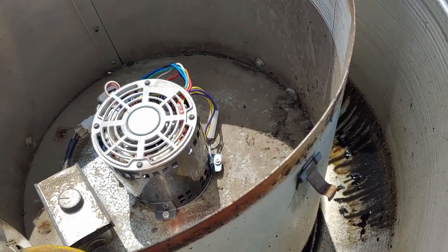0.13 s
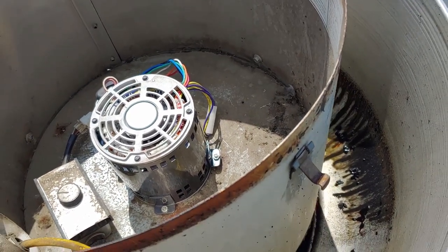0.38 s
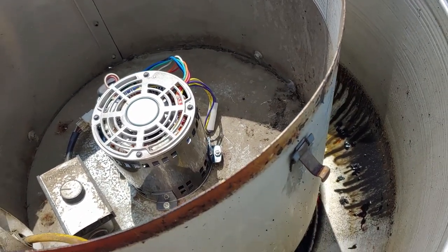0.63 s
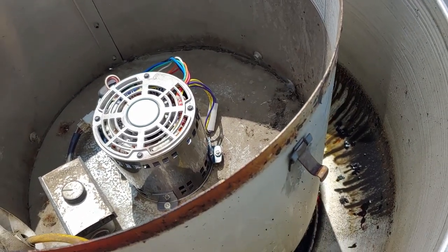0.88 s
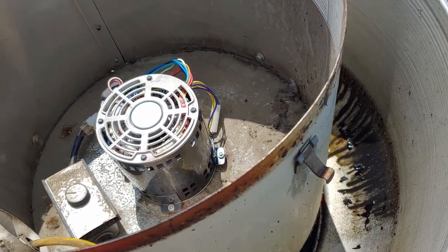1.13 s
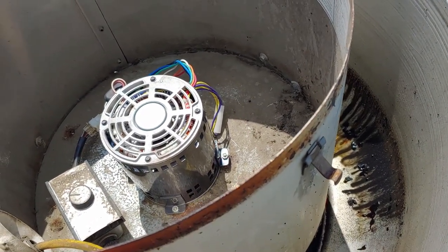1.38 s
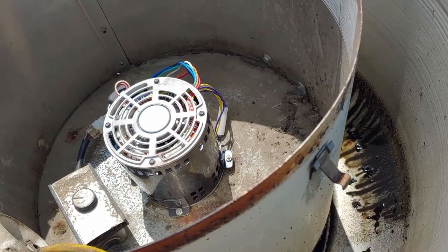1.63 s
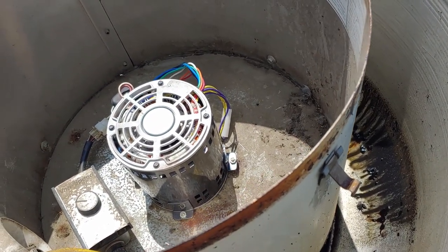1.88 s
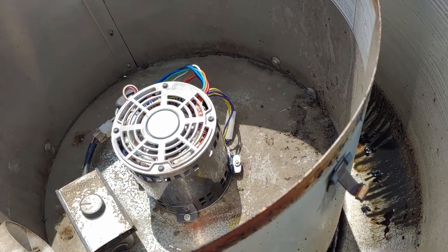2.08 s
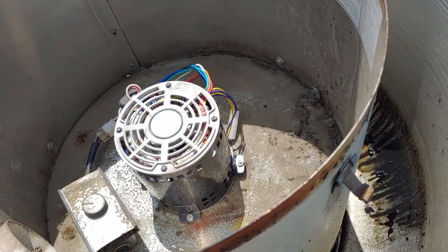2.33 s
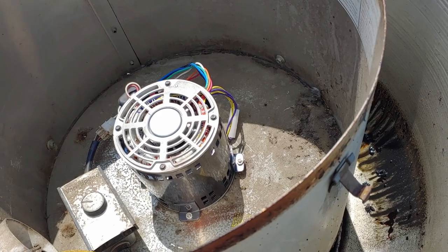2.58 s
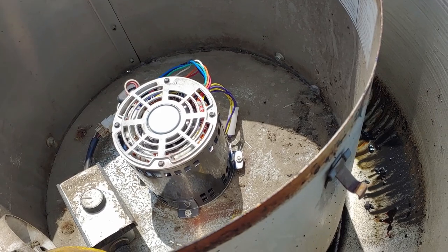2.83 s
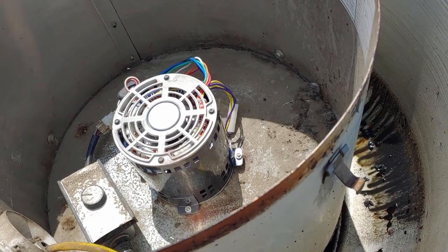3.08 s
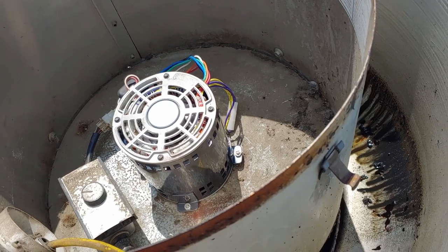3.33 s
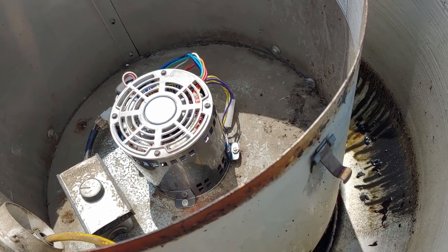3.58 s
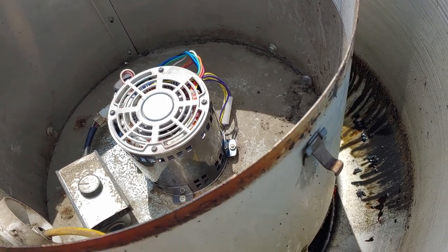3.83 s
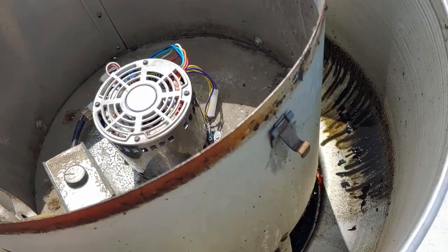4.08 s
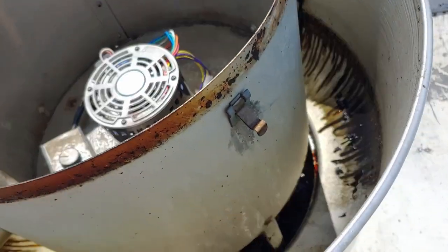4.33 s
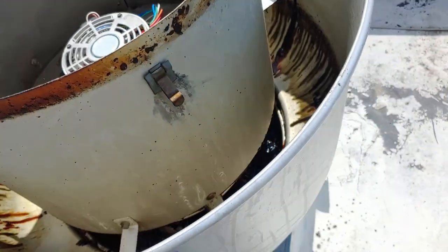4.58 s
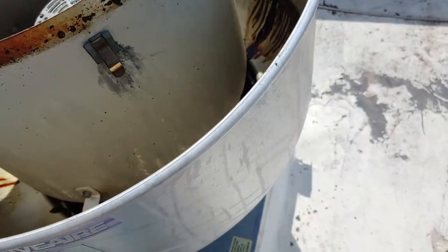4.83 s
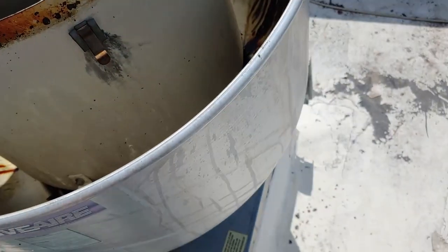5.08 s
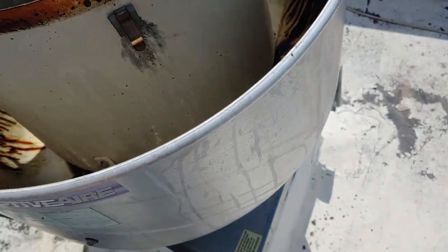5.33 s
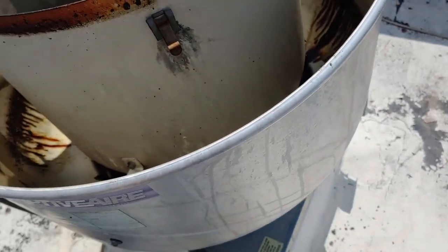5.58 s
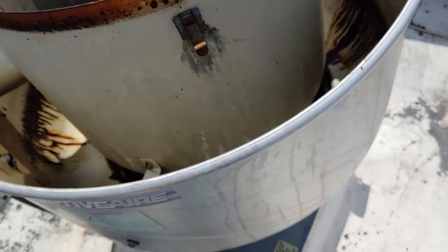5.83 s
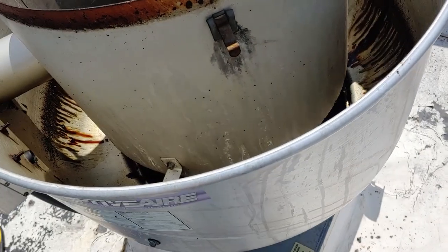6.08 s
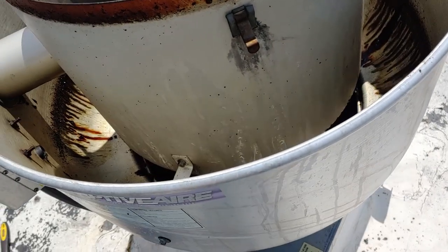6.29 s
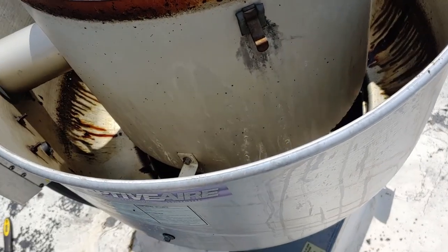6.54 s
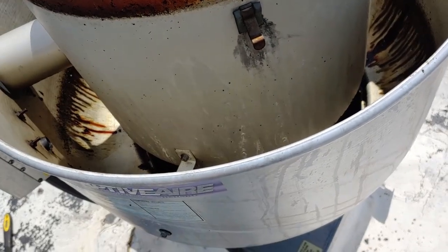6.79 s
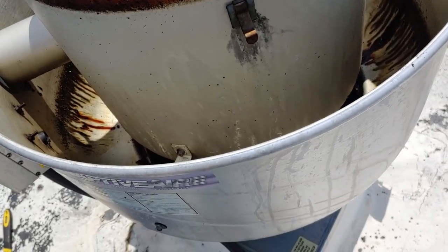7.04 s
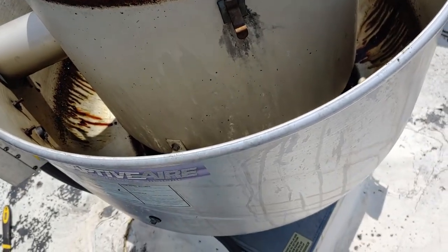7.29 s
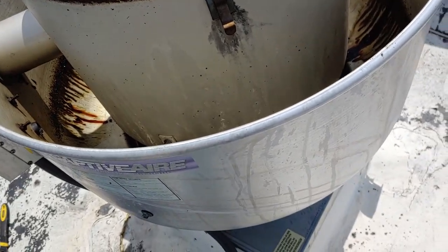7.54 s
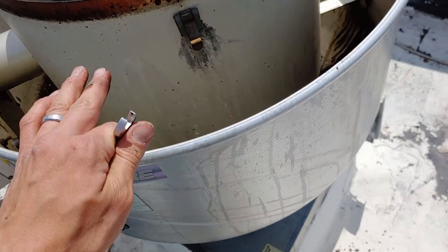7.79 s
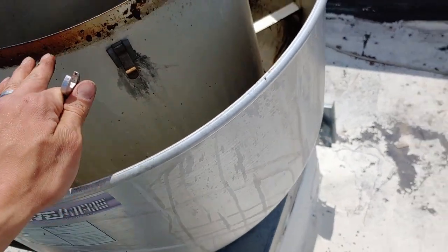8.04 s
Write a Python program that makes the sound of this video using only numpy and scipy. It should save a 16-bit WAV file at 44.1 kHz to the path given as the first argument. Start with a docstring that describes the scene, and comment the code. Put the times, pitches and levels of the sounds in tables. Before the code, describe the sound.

Electric fan motor hums and whines upward as rushing air builds to a steady roar, with wind thumps, mostly left, and scratchy metallic ticks.

```python
"""A rooftop exhaust fan runs up to speed: mains hum and blade tones are sines, rotor whines sweep through
housing resonances, and a roar and a rush of air are filtered noise that grows with speed.
Gusts buffet two microphone ports, mostly the left, as lumpy low noise with sharp pops.
Grit rattles on the sheet-metal housing as noise bursts that ring its modes; a faint hiss lies far off.
The recorder ducks after loud gusts and overloads softly."""
import sys
import numpy as np
from scipy import signal
from scipy.fft import rfft, irfft, next_fast_len
from scipy.io import wavfile
from scipy.ndimage import uniform_filter1d

SR = 44100
rng = np.random.default_rng(int(sys.argv[2]) if len(sys.argv) > 2 else 0)


def natural_amplitude(level_db):
    """Convert a level in decibels to a linear amplitude factor, elementwise."""
    exponent = np.asarray(level_db, float) / 20
    return 10 ** exponent


def unload_wav(signal):
    """Save mono or channel-first audio to the path in sys.argv[1] as 16-bit WAV at rate SR, clipped to [-1, 1]."""
    wavfile.write(
        sys.argv[1],
        SR,
        np.round(np.clip(np.atleast_2d(signal).T, -1, 1) * 32767).astype(np.int16),
    )


N = 360297
T = np.arange(N) / SR
FFT_SIZE = next_fast_len(N)
MAINS_HZ, FULL_SPEED_HZ = 59.8, 248  # full speed in blades per second

# fan speed: time_s, blade_rate_hz
BLADE_RATE = [(0, 60.22), (.5, 67.9), (.95, 71.24), (1.4, 80.26), (1.8, 91.6), (2.2, 107.3), (2.5, 122),
              (2.65, 129.5), (2.9, 145.2), (3.2, 165.3), (3.5, 186), (3.9, 209), (4.3, 235), (4.6, 246.6),
              (4.95, 249.6), (8.17, 248.8)]
# hum at twice the mains: time_s, rms_db
HUM_LEVEL = [(0, -22.5), (1.3, -38.5), (2.4, -22.5), (3.5, -23), (4.5, -22), (4.85, -32.5), (5.4, -30.5),
             (5.7, -22.5), (6.05, -22.5), (6.25, -24.5), (7.1, -34.5), (7.4, -22), (7.75, -35), (8, -19),
             (8.17, -30.5)]
# further hum lines: mains_multiple
LOAD_HUM_MULTIPLES = (3, 4, 6)
# base level of those lines: rms_db
LOAD_HUM_LEVELS = (-24.5, -32, -35)
# gain on those lines under run-up load: time_s, gain_db
LOAD_GAIN = [(0, -2), (.75, 2.5), (1.05, -8), (1.5, -2), (2.2, 3.5), (2.7, 3.5), (3.2, 3), (3.5, -3),
             (3.75, -18.5), (4.2, -23.5)]
# slot whine and sidebands: offset_mains_multiples, base_db
WHINE_LINES = [(-2, -45), (0, -44), (2, -50), (3, -49), (5, -52)]
# gain on the whine: time_s, gain_db
WHINE_GAIN = [(0, 2), (1.2, -5), (2, 6), (2.45, 3.5), (2.6, -2), (2.8, -1.5), (3, -2), (3.25, -16)]
# housing resonances the whine sweeps through: centre_hz, width_hz, lift_db
SHELL_RESONANCES = [(323, 30, 2), (400, 27, 7), (464, 15, 11.5), (515, 40, -1.5), (552, 120, 9.5),
                    (700, 100, 7.5), (850, 42, 19.5)]
# blade tone: time_s, rms_db
BLADE_LEVEL = [(2.4, -51.5), (3, -28), (3.4, -15), (3.7, -30.5), (4.1, -45), (4.35, -22.5), (4.6, -32.5),
               (5, -31), (5.5, -30), (6, -24), (6.4, -28), (6.8, -39), (7.1, -31), (7.5, -25.5),
               (8.17, -28.5)]
# changing level of the air sound, with brief dips: time_s, roar_gain_db, rush_gain_db, treble_gain_db
AIR_GAIN = [(0, 0.5, 4.5, 6.5), (1, -2.5, -1, -15), (1.8, 2, 2, -22), (2.6, 2.5, 0.5, -1.5),
            (3.6, 1, 2.5, 2.5), (4.4, -0.5, 0.5, 2), (4.75, -2, -2.5, 3), (4.9, -2.5, -3, 5.5),
            (5.1, -2, -1.5, 3), (5.4, -3, -6.5, 7), (6, -0.5, 0, 0), (6.18, 2, -1.5, -1),
            (6.25, -1, -4.5, 3), (6.4, 0.5, -5, -5), (6.65, -2, -5, 1), (6.8, -1, -7.5, -1),
            (7.1, -3.5, -7, -2), (7.35, -1.5, -6, 0), (7.6, -1, -4.5, -10.5), (7.8, -0.5, -3.5, 0),
            (8, 0.5, -3, -6), (8.17, 1.5, -2.5, -7.5)]
# roar spectrum: freq_hz, density_db
ROAR_SPECTRUM = [(30, -6), (60, 1), (120, 0.5), (200, 1.5), (290, -2), (322, 2.5), (355, -0.5), (420, -2.5),
                 (500, -1.5), (560, -10), (640, -10.5), (900, -12), (1200, -17), (2000, -26), (5000, -120)]
# housing drone relative to the roar: time_s, gain_db
DRONE_GAIN = [(2.9, -16.5), (3.15, -10.5), (3.5, -8.5), (4.2, -12.5), (4.75, 1), (5.1, -14), (5.7, -8),
              (6.15, -1.5), (6.35, -10.5), (7.3, -7), (7.7, 1), (8.17, -6.5)]
# rush spectrum: freq_hz, density_db
RUSH_SPECTRUM = [(530, -35.5), (900, -1.5), (1110, -10.5), (1500, 0.5), (2270, -8.5), (2600, -10.5),
                 (3100, -11.5), (4070, -11), (5290, -20), (6640, -25.5), (7300, -37.5), (7900, -68),
                 (8500, -46.5), (11000, -45), (12100, -46.5), (15700, -41), (22000, -120)]
# distant hiss spectrum: freq_hz, density_db
FAR_SPECTRUM = [(710, -31), (1200, -6.5), (1390, -6.5), (1980, -10), (2440, -15.5), (3850, -24),
                (7000, -36), (9100, -64), (15400, -120)]
# likeness of the two ports: freq_hz, likeness_0_to_1
PORT_LIKENESS = [(60, 1), (300, 1), (1000, 0.77), (2000, 0.31), (3000, 0.1), (6000, 0.3), (8500, 0.18),
                 (12000, 0.3)]
# tilt between ports: freq_hz, left_minus_right_db
PORT_TILT = [(60, -0.5), (110, 0), (190, 1), (350, -0.5), (620, -1.5), (1120, -5.5), (2010, 2),
             (3610, -7.5), (6470, 4.5), (11600, 5)]
# left wind level before gusts and trim: time_s, level_db
LEFT_WIND = [(0, -10), (.08, -16), (.14, -9.5), (.25, -6.5), (.3, -17), (.36, -16), (.46, -10), (.5, -23),
             (.58, -15.5), (.64, -2.5), (.72, -18), (.8, -15), (.95, -8), (1.15, -20), (1.45, -7.5),
             (1.65, -31.5), (2.15, -23), (2.5, -29), (2.75, -13.5), (3.15, -24), (3.5, -17), (3.8, -8),
             (4.05, -15), (4.3, -30), (4.55, -6), (4.8, -15.5), (4.95, -38), (5.05, -6.5), (5.2, -15.5),
             (5.32, -6.5), (5.37, -20.5), (5.5, -14.5), (5.6, -20), (5.9, -10), (6.1, -21.5), (6.25, -8.5),
             (6.4, -16.5), (6.46, -8), (6.54, -13.5), (6.62, -9.5), (6.67, -24), (6.72, -7.5), (6.9, -8.5),
             (6.95, -16), (7, -10.5), (7.14, -6), (7.19, -18.5), (7.4, -47.5), (7.57, -9.5), (7.68, -56),
             (8, -43), (8.17, -13)]
# right wind level before gusts and trim: time_s, level_db
RIGHT_WIND = [(0, -18), (.3, -12.5), (.85, -23.5), (1.2, -28), (1.4, -14.5), (1.65, -31.5), (2, -28.5),
              (2.45, -39), (2.75, -22), (3.1, -35), (4.1, -29.5), (4.6, -33), (5.5, -50), (6, -29.5),
              (6.9, -56), (7.4, -42), (8.17, -27)]
# left buffeting relative to the rumble: time_s, gain_db
LEFT_BUFFETING = [(0, -13.5), (.5, -18), (1, -15), (1.3, -10), (1.6, -6.5), (2.8, -34), (4, -19.5),
                  (5.299, -10.5), (5.9, -28), (6.7, -17), (7.1, -14), (8.17, -11.5)]
# wind rumble spectrum: freq_hz, density_db
RUMBLE_SPECTRUM = [(15, -31), (30, 0), (55, 9), (90, 5), (150, 1), (250, -4), (400, -15.5), (700, -51.5),
                   (2000, -120)]
# wind buffet spectrum: freq_hz, density_db
BUFFET_SPECTRUM = [(150, -7.5), (280, -1), (450, -2.5), (700, -17.5), (1100, -30.5), (1800, -28),
                   (3000, -79.5), (7000, -120)]
# left wind pops before smoothing and trim: start_s, level_db, t60_s
WIND_POPS = [(0.014, -13.5, 0.14), (0.093, -15.5, 0.066), (0.143, -7.5, 0.06), (0.172, -8, 0.047),
             (0.207, -11, 0.088), (0.24, -11.5, 0.046), (0.267, -15, 0.042), (0.335, -14, 0.2),
             (0.381, -10, 0.11), (0.396, -11.5, 0.18), (0.446, -17, 0.096), (0.567, -20, 0.11),
             (0.621, -6, 0.031), (0.635, -8.5, 0.14), (0.67, -10.5, 0.029), (0.776, -11, 0.066),
             (0.805, -8.5, 0.1), (0.838, -5, 0.049), (0.82, -13, .08), (0.859, -3.5, 0.083),
             (0.935, -38.5, 0.032), (0.977, -17, 0.029), (0.999, -7, 0.059), (1.031, -8.5, 0.025),
             (1.083, -22.5, 0.048), (1.514, -21, 0.047), (1.572, -12.5, 0.044), (3.772, -20, 0.079),
             (3.851, -15.5, 0.069), (4.56, -8.5, .08), (4.601, -6, 0.06), (4.636, -12, 0.04),
             (4.67, -12, 0.05), (5.201, -17, 0.065), (5.259, -11, 0.05), (5.286, -16, 0.039),
             (5.31, -7.5, 0.062), (6.442, -8, 0.085), (6.501, -10, 0.072), (6.567, -11.5, 0.09),
             (6.613, -17, 0.028), (6.634, -7, 0.016), (6.707, -5.5, 0.064), (6.741, -12, .04),
             (6.757, -6, 0.16), (6.836, -7.5, 0.055), (6.859, -5.5, 0.043), (6.986, -8, 0.071),
             (7.017, -7, 0.055), (7.072, -6.5, 0.069), (7.102, -15, 0.035), (7.122, -11, 0.037),
             (7.144, -12, 0.08)]
# pop spectrum: freq_hz, density_db
POP_SPECTRUM = [(150, 0.5), (300, 1.5), (600, -4.5), (1000, -18), (1600, -33.5), (2500, -47), (4500, -74.5),
                (8000, -120)]
# thin left tick: start_s, envelope_peak_db, t60_s
LEFT_TICK = (1.009, -31, .016)
# tick spectrum: freq_hz, density_db
TICK_SPECTRUM = [(600, -30), (1200, 0), (2500, -3), (4800, -8), (6000, -40), (9000, -120)]
# grit strikes before band trims: start_s, level_db, knock_rel_db, treble_rel_db, base_t60_s
GRIT_STRIKES = [(1.8134, -42, 2, -19.5, 0.11), (2.0156, -24.5, 3, -19.5, 0.073),
                (2.192, -35.5, 4, -25.5, 0.066), (2.4668, -34.5, -5.5, -29.5, 0.068),
                (2.652, -34.5, 0, -16.5, 0.14), (2.746, -31.5, 5, -22, 0.17),
                (2.8672, -30.5, 7.5, -33.5, 0.1), (2.898, -19.5, -5, -19.5, 0.18),
                (3.025, -26, 0.5, -30, 0.21), (3.067, -21.5, -2, -18.5, 0.075), (3.118, -26, 7, -24, 0.086),
                (3.13, -23.5, 7, -27, 0.06), (3.1817, -21.5, -8.5, -16, 0.076),
                (3.24, -25, -4.5, -24, 0.11), (3.32, -24, 0.5, -18.5, 0.16),
                (3.3503, -7.5, -2.5, -20, 0.099), (3.362, -9, -0.5, -23.5, 0.035),
                (3.393, -31, 5, -31.5, .06), (3.446, -25, 3, -17.5, 0.09), (3.469, -19, -11, -21.5, 0.057),
                (3.49, -25, -1, -19, 0.18), (3.567, -22.5, -8.5, -21, 0.13), (3.695, -22, 8.5, -29, 0.088),
                (3.717, -18, 5.5, -23, 0.071), (3.732, -21.5, -3, -21, 0.056), (3.747, -21.5, 3, -29, .04),
                (3.8172, -21.5, -2, -38.5, 0.068), (3.92, -23.5, -1, -26.5, 0.064),
                (3.978, -19.5, 3, -26.5, 0.13), (4.3143, -27.5, -1, -16.5, 0.28),
                (4.419, -16.5, -6, -17.5, 0.13), (4.502, -17.5, -27, -14.5, 0.047),
                (4.5504, -22, -0.5, -21, 0.089), (4.644, -21.5, 0.5, -13.5, 0.12),
                (5.0773, -24.5, -9, -18, 0.08), (5.1053, -31, -14, -21.5, 0.16), (5.288, -24, 1, -16, 0.21),
                (5.3817, -24.5, -9.5, -17.5, 0.14), (5.62, -30, -10, -12.5, 0.061),
                (5.8216, -27, -17, -25, 0.072), (5.89, -19, -10, -20, 0.074),
                (5.9737, -21, -3.5, -21, 0.084), (6.342, -28.5, -0.5, -14.5, 0.065),
                (6.4747, -21.5, -16, -16.5, 0.1), (6.625, -27, -11, -19, 0.09), (7.143, -32, 4, -18, 0.11),
                (7.345, -29.5, -7, -15.5, .08), (7.713, -26, -9.5, -35, 0.063),
                (7.822, -29, -9, -17.5, 0.32), (7.87, -33.5, -0.5, -14, .1), (7.955, -31.5, -13, -18, .1)]
# broad strike spectrum: freq_hz, density_db
SCRAPE_SPECTRUM = [(710, -58), (1200, -19), (1770, -2.5), (2000, -6), (2340, -9), (2970, -0.5), (3790, -3),
                   (4380, 1), (5910, -14.5), (10200, -10.5), (12100, -10), (15700, -59.5), (22000, -120)]
# sheet-metal modes: centre_hz, width_hz (30 at least in use), gain_db
METAL_MODES = [(1540, 320, -2), (1720, 19, 0.5), (2190, 170, 8), (2330, 57, 6.5), (2590, 80, -18.5),
               (2875, 29, 1), (3174, 63, -4), (3370, 57, -3.5), (3570, 35, -10.5), (4020, 33, 3.5),
               (4300, 27, -10.5), (4570, 29, -12), (5230, 46, -8.5), (6490, 550, 4)]


def evened(x):
    """Scales to rms 1."""
    return x / np.sqrt(np.mean(x ** 2) + 1e-20)


def read(points, hz):
    """Reads a spectrum table on a log-frequency axis."""
    table_hz, value = np.transpose(points)
    return np.interp(np.log(hz + 1), np.log(table_hz + 1), value)


def curves(rows, t):
    """Interpolates every column of a table at times t."""
    time_s, *columns = np.transpose(rows)
    return [np.interp(t, time_s, column) for column in columns]


def drift(hz):
    """Slow random signal of rms 1, low-passed near hz."""
    step = 16  # samples per slow point
    size = next_fast_len(N // step + 2)
    freq_hz = np.fft.rfftfreq(size, step / SR)
    slow = irfft(rfft(rng.standard_normal(size)) / (1 + (freq_hz / hz) ** 4), size)
    return evened(np.interp(T, np.arange(size) * step / SR, slow))


def noise(spectrum):
    """White noise filtered by a spectrum table; rms 1."""
    gain = natural_amplitude(read(spectrum, np.fft.rfftfreq(FFT_SIZE, 1 / SR)))
    white = rng.standard_normal(N)
    return evened(irfft(rfft(white, FFT_SIZE) * gain, FFT_SIZE)[:N])


def highpass(x, order, hz):
    """Zero-phase Butterworth high-pass."""
    return signal.sosfiltfilt(signal.butter(order, hz, "high", fs=SR, output="sos"), x)


def tone(hz, rms_db):
    """Sine that integrates a pitch curve, from a random phase."""
    cycles = np.cumsum(hz * np.ones(N)) / SR + rng.random()
    return np.sqrt(2) * natural_amplitude(rms_db) * np.sin(2 * np.pi * cycles)


def bursts(starts_s, peaks_db, t60s_s, hold=1.3):
    """Power envelope of sudden rises, each cut at 0.25 s; hold above 1 delays the decay."""
    power = np.zeros(N)
    for start_s, peak_db, t60_s in zip(starts_s, peaks_db, t60s_s):
        part = power[round(start_s * SR):][:SR // 4]
        fall_db = 60 * (T[:len(part)] / max(t60_s, 0.01)) ** hold
        part += natural_amplitude(2 * (peak_db - fall_db))
    return power


def ring(x, patch_db=0):
    """Sheet metal rings at its modes, each excited unevenly in time by patch_db."""
    total = np.zeros(N)
    for hz, width_hz, gain_db in METAL_MODES:
        push = x * evened(natural_amplitude(patch_db * drift(54)))
        mode = signal.iirpeak(hz, hz / max(width_hz, 30), SR)
        total += natural_amplitude(gain_db) * signal.lfilter(*mode, push)
    return total


def mains_hum():
    """Wavering magnetic hum at twice the mains, plus multiples that follow the load."""
    hum = tone(2 * MAINS_HZ + 3.2 * drift(14), curves(HUM_LEVEL, T)[0] + 3.4 * drift(24))
    load_db, = curves(LOAD_GAIN, T)
    for multiple, base_db in zip(LOAD_HUM_MULTIPLES, LOAD_HUM_LEVELS):
        hz = multiple * (MAINS_HZ + 0.401 * drift(4.35))
        hum += tone(hz, base_db + load_db + 1.6 * drift(2.1))
    return hum


def rotor_whine():
    """Rotor slots whine at five times the blade rate, with mains sidebands lifted by the shell."""
    slots_per_blade, shell_top_hz = 5, 577  # the shell radiates little whine above this
    blade_hz, = curves(BLADE_RATE, T)
    fade_db, = curves(WHINE_GAIN, T)
    whine = np.zeros(N)
    for offset, base_db in WHINE_LINES:
        hz = slots_per_blade * blade_hz + offset * MAINS_HZ
        shell_db = sum(lift_db / (1 + (2 * (hz - centre_hz) / width_hz) ** 2)
                       for centre_hz, width_hz, lift_db in SHELL_RESONANCES)
        shell_db -= np.clip(0.2 * (hz - shell_top_hz), 0, 9) + 0.2 * np.maximum(hz - 920, 0)
        whine += tone(hz + 1.83 * drift(6.1), base_db + shell_db + fade_db + 2.2 * drift(16))
    return whine


def airflow():
    """Levels in dB of roar, rush and treble: a law of fan speed plus a changing gain."""
    speed_db = 20 * np.log10(curves(BLADE_RATE, T)[0] / FULL_SPEED_HZ)
    roar_gain_db, rush_gain_db, treble_gain_db = curves(AIR_GAIN, T)
    # level at full speed before the changing gain; dB gained per dB of speed
    return (-18 + 0.95 * speed_db + roar_gain_db,
            -27.5 + 1.96 * speed_db + rush_gain_db,
            -19.5 + 0.83 * speed_db + treble_gain_db)  # treble is relative to the rush


def roar(roar_db):
    """Low turbulence in the housing: noise with slow level drift."""
    return natural_amplitude(roar_db + 2.1 * drift(2.6) + 0.99 * drift(8.3)) * noise(ROAR_SPECTRUM)


def rush(rush_db, treble_db):
    """Turbulent hiss, coloured a little by the metal, that brightens with speed."""
    hiss = noise(RUSH_SPECTRUM)
    hiss = evened(hiss + 0.25 * ring(hiss))
    treble = highpass(hiss, 6, 7300)
    hiss = hiss - treble + natural_amplitude(treble_db) * evened(treble)
    return natural_amplitude(rush_db + 0.33 * drift(12)) * hiss


def distant_hiss():
    """Steady faint noise from over the roofs."""
    return natural_amplitude(-59.5) * noise(FAR_SPECTRUM)


def wind_pressure(wind_db, buffet_db):
    """Lumpy wind pressure at one port; strong lumps lift the higher buffet noise more than the rumble."""
    lumps = 2 * np.tanh(drift(23) / 2)
    gust_db = 2 * 2 * np.tanh(drift(7.7) / 2)
    rumble = noise(RUMBLE_SPECTRUM) * evened(natural_amplitude(3 * lumps))
    buffet = noise(BUFFET_SPECTRUM) * evened(natural_amplitude(4.6 * lumps + 2.2 * drift(54)))
    return natural_amplitude(wind_db + gust_db + 3.5) * (rumble + natural_amplitude(buffet_db) * buffet)


def wind_pops():
    """Sharp pressure pops: smoothed bursts of rough low noise."""
    envelope = np.sqrt(bursts(*np.transpose(WIND_POPS), hold=1.5))
    envelope = signal.oaconvolve(envelope, np.hanning(140) / 70, "same")
    return natural_amplitude(3.5) * envelope * evened(natural_amplitude(2.3 * drift(190))) * noise(POP_SPECTRUM)


def wind():
    """Independent wind at each port, with pops and one thin tick on the left."""
    left = wind_pressure(curves(LEFT_WIND, T)[0], curves(LEFT_BUFFETING, T)[0])
    right = wind_pressure(curves(RIGHT_WIND, T)[0], -16)
    left += wind_pops() + tick()
    return np.array([left, right])


def tick():
    """One short burst of thin noise."""
    return np.sqrt(bursts(*np.transpose([LEFT_TICK]))) * noise(TICK_SPECTRUM)


def grit_envelopes():
    """Strike and random fine-grit envelopes in four bands; low modes ring longest."""
    start_s, level_db, knock_db, treble_db, t60_s = np.transpose(GRIT_STRIKES)
    specks_per_s, specks_rel_db, speck_t60_s = 40, -2.5, 0.064  # base level relative to the rush
    specks = (rng.random(N) < specks_per_s / SR) * natural_amplitude(6 * np.minimum(rng.exponential(1, N), 1.5))
    specks = signal.oaconvolve(specks, natural_amplitude(-120 * T[:SR // 8] / speck_t60_s))[:N]  # power decay
    specks *= natural_amplitude(2 * (airflow()[1] + specks_rel_db))
    specks *= (curves(BLADE_RATE, T)[0] / FULL_SPEED_HZ) ** 2
    hold = 1.1
    knock = bursts(start_s, level_db + knock_db, 1.75 * t60_s, hold) + 0.5 * specks
    body = bursts(start_s, level_db, 1.43 * t60_s, hold) + specks
    upper = bursts(start_s, level_db, 0.9 * t60_s, hold) + specks
    treble = bursts(start_s, level_db + treble_db, 0.8 * t60_s, hold) + natural_amplitude(-38.5) * specks
    skid = evened(natural_amplitude(1.2 * drift(140)))  # contacts come in uneven clusters
    return skid * np.sqrt(abs(np.array([knock, body, upper, treble])))


def grit(knock, body, upper, treble):
    """Skidding contacts scrape as broad noise and ring the sheet metal patch by patch."""
    scrape = noise(SCRAPE_SPECTRUM)
    low = signal.sosfiltfilt(signal.butter(4, 2550, fs=SR, output="sos"), scrape)
    high = highpass(scrape, 4, 4900)
    top = highpass(scrape, 6, 7300)
    middle = scrape - low - high
    scale = np.std(scrape - low - top)
    contact = knock * evened(low) + (body * middle + natural_amplitude(4.5) * upper * (high - top)) / scale
    rattle = natural_amplitude(-8) * (0.8 * contact + 1.01 * ring(contact, patch_db=4))
    return rattle + natural_amplitude(0.5) * treble * evened(top)


def blade_tones():
    """Blade-passing sine and its double, the latter heard as it crosses a housing resonance."""
    blade_hz, = curves(BLADE_RATE, T)
    blades = tone(blade_hz + 2.5 * drift(8), curves(BLADE_LEVEL, T)[0] + 1.3 * drift(6))
    peak_db, centre_hz, width_hz = -31, 328, 45
    detune = 2 * (2 * blade_hz - centre_hz) / width_hz
    return blades + tone(2 * blade_hz, peak_db - 20 * np.log10(1 + detune ** 2))


def housing_drone(roar_db):
    """Air in the housing resonates: noise through one narrow peak."""
    centre_hz, width_hz = 319, 30
    peak = signal.iirpeak(centre_hz, centre_hz / width_hz, SR)
    drone = evened(signal.lfilter(*peak, rng.standard_normal(N)))
    return natural_amplitude(roar_db - 2 + curves(DRONE_GAIN, T)[0]) * drone


def air():
    """Sum of roar, rush, distant hiss and housing drone."""
    roar_db, rush_db, treble_db = airflow()
    return roar(roar_db) + rush(rush_db, treble_db) + distant_hiss() + housing_drone(roar_db)


def ports(x, other):
    """Sound at two ports: partly alike by frequency, tilted, and later on the right."""
    hz = np.fft.rfftfreq(FFT_SIZE, 1 / SR)
    lag_s = 0.00019
    same = np.clip(read(PORT_LIKENESS, hz), 0, 1)
    tilt = natural_amplitude(read(PORT_TILT, hz) / 2)
    left = rfft(x, FFT_SIZE)
    right = same * left + np.sqrt(1 - same ** 2) * rfft(other, FFT_SIZE)
    right = right * np.exp(-2j * np.pi * hz * lag_s)
    return irfft(np.array([left * tilt, right / tilt]), FFT_SIZE)[:, :N]


def scene():
    """Fan and grit reach both ports; wind acts on each alone."""
    motor = mains_hum() + rotor_whine() + blade_tones()
    envelopes = grit_envelopes()
    first = motor + air() + grit(*envelopes)
    second = motor + air() + grit(*envelopes)  # same tones and envelopes, fresh noise
    return ports(first, second) + wind()


def roll_off(x):
    """The treble ends steeply here."""
    return signal.sosfilt(signal.butter(12, 12220, fs=SR, output="sos"), x)


def record(dry):
    """Gain control ducks both ports after loud gusts; peaks then bend softly toward full scale."""
    power_db = 10 * np.log10(abs(uniform_filter1d((dry ** 2).max(0), size=300)) + 1e-12)
    recovery_db = T * 52.0  # 52 dB per second
    held_db = np.maximum.accumulate(power_db + recovery_db) - recovery_db
    over_db = np.maximum(held_db + 4, 0)  # threshold -4 dB
    late_db = uniform_filter1d(over_db, size=501, origin=250)  # reacts a little late
    ducked = dry / natural_amplitude(0.6 * late_db)
    knee = 0.46
    over = np.maximum(abs(ducked) - knee, 0)
    bent = (1 - knee) * np.tanh(over / (1 - knee))
    mix = ducked - np.sign(ducked) * (over - bent)
    return roll_off(mix)


dry = scene()
out = record(dry)
unload_wav(out)
```